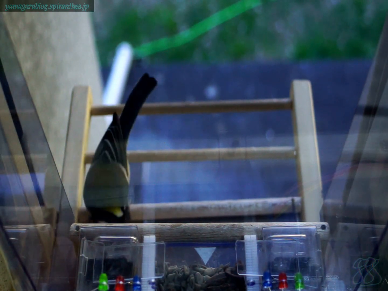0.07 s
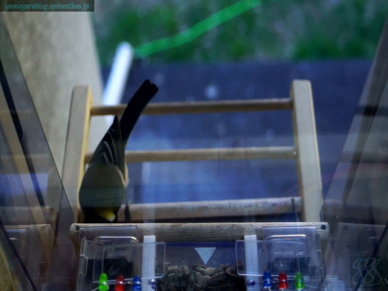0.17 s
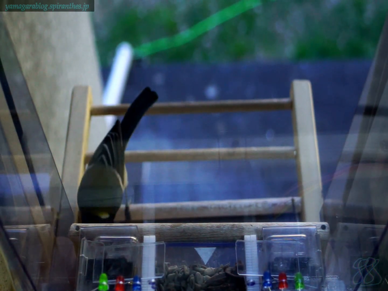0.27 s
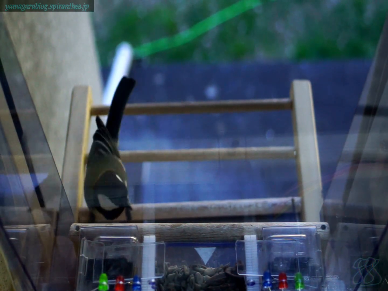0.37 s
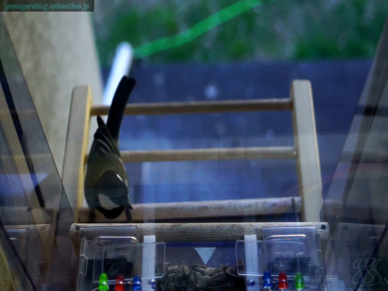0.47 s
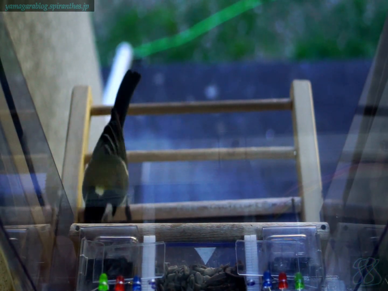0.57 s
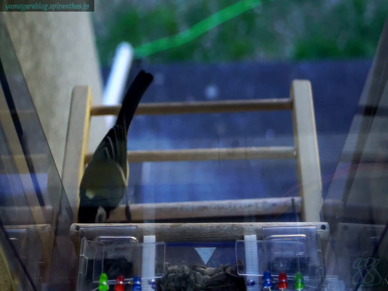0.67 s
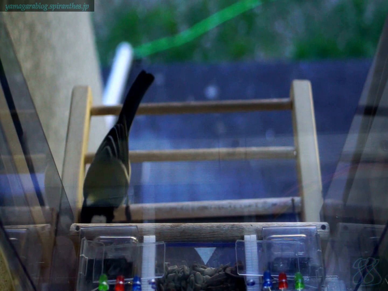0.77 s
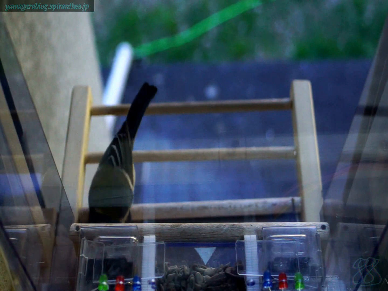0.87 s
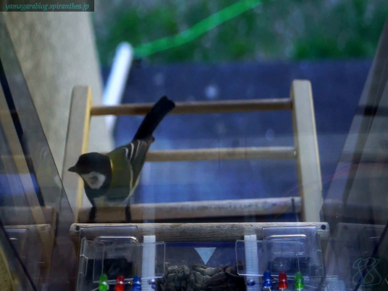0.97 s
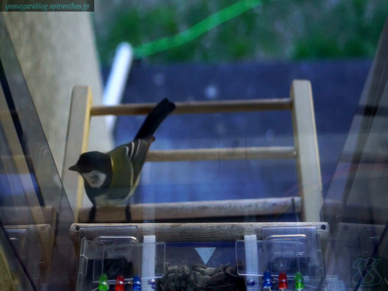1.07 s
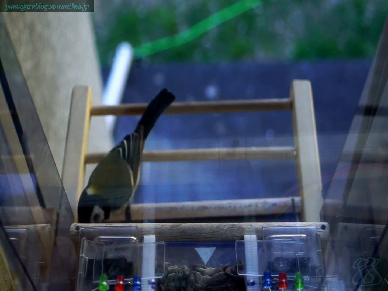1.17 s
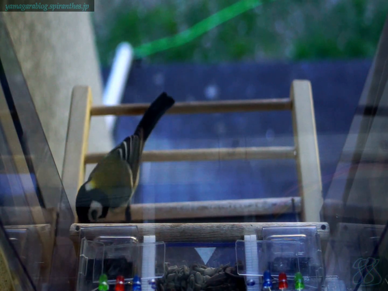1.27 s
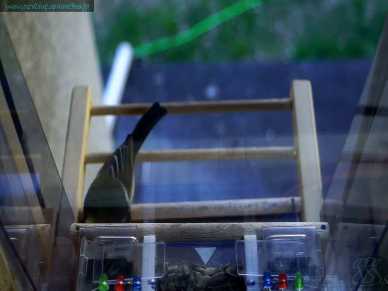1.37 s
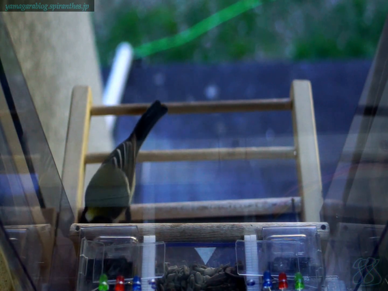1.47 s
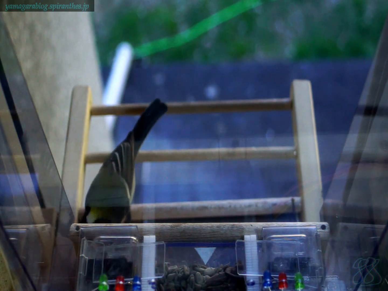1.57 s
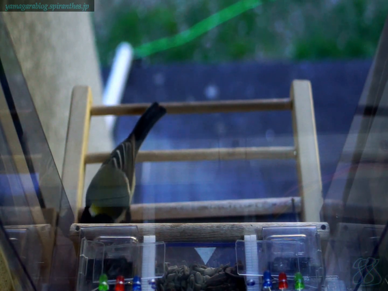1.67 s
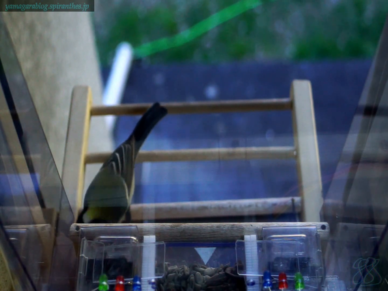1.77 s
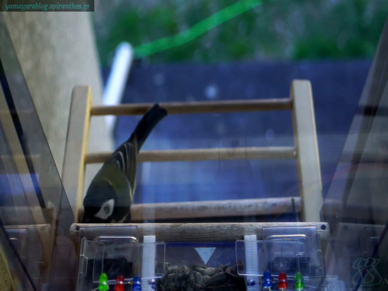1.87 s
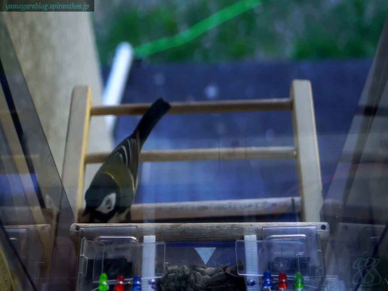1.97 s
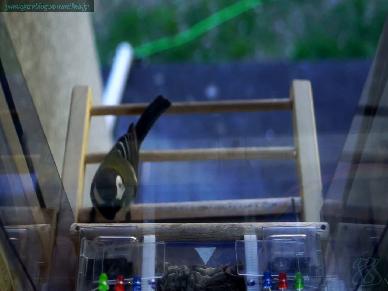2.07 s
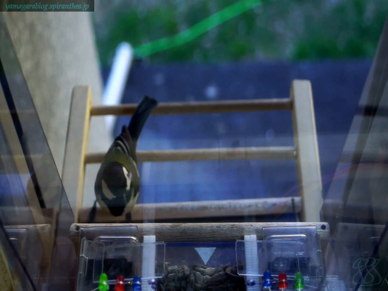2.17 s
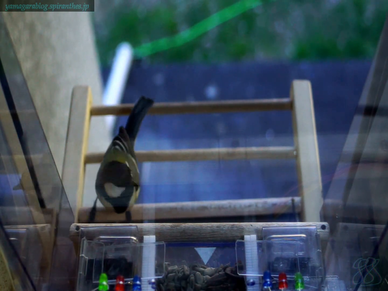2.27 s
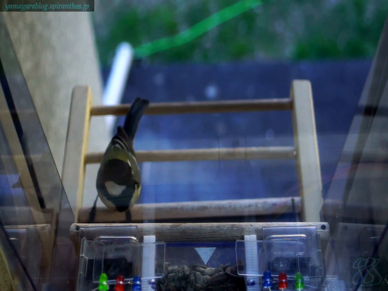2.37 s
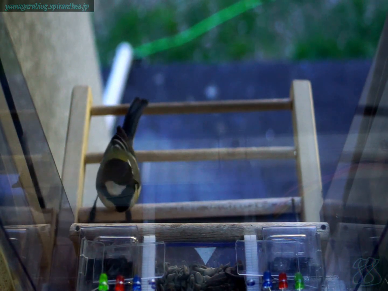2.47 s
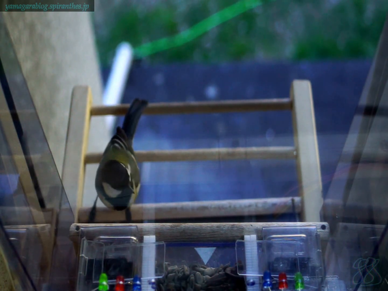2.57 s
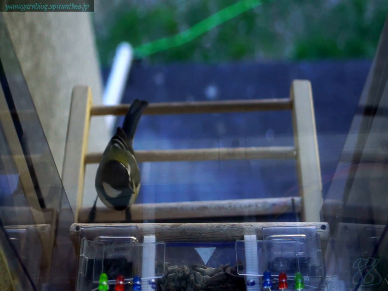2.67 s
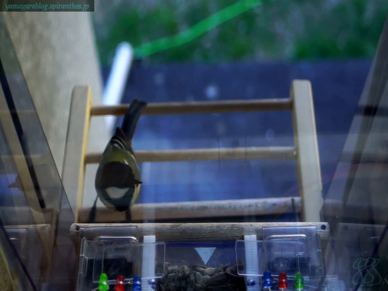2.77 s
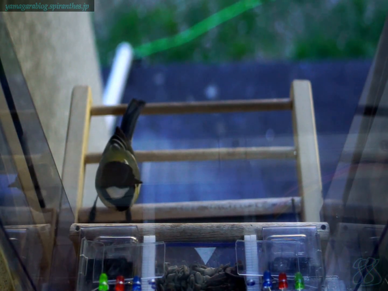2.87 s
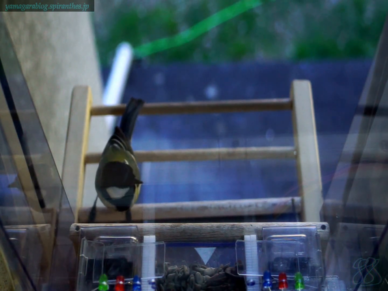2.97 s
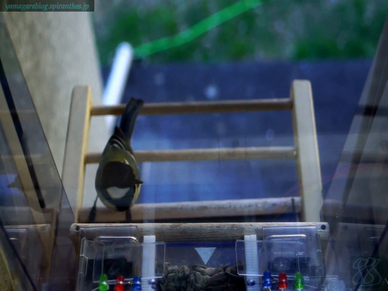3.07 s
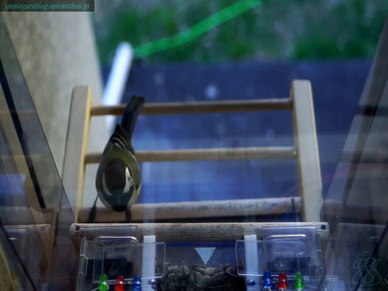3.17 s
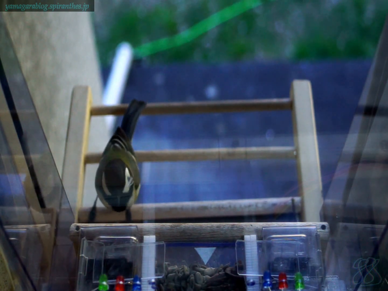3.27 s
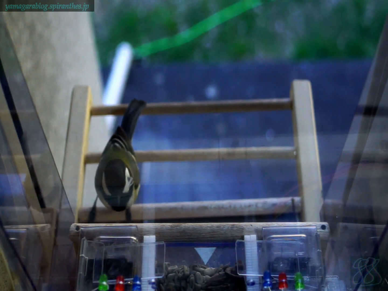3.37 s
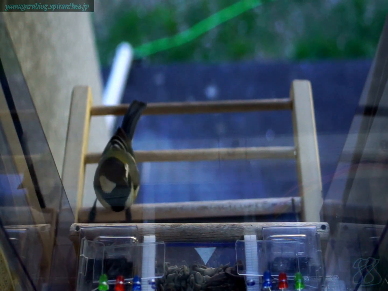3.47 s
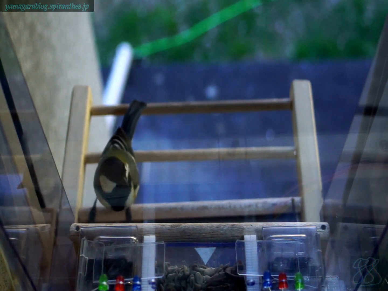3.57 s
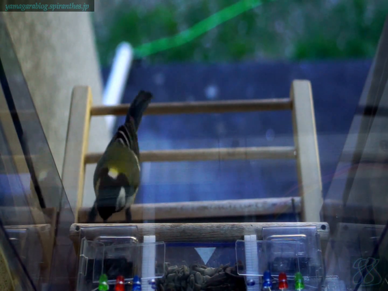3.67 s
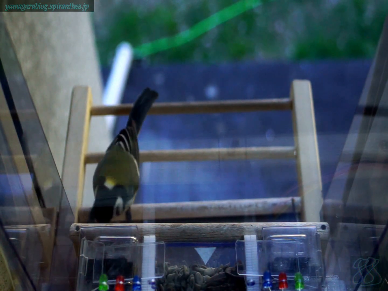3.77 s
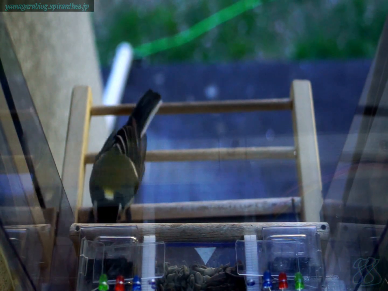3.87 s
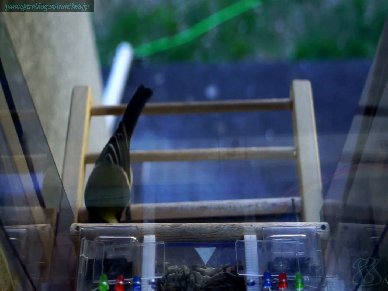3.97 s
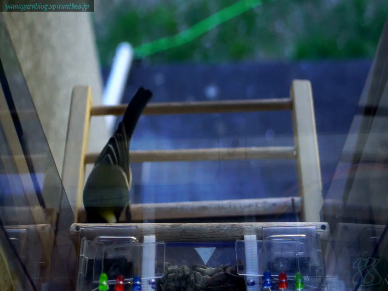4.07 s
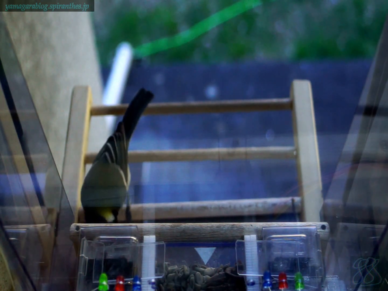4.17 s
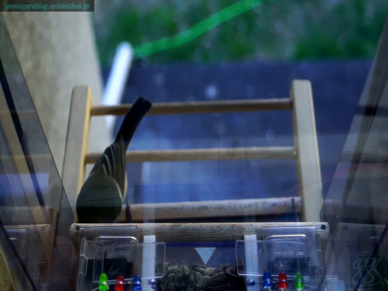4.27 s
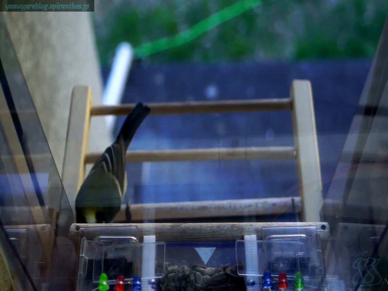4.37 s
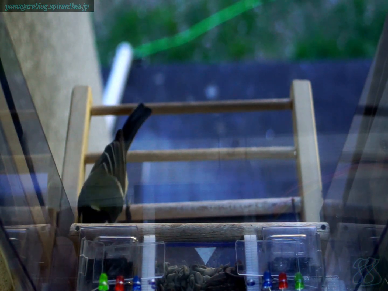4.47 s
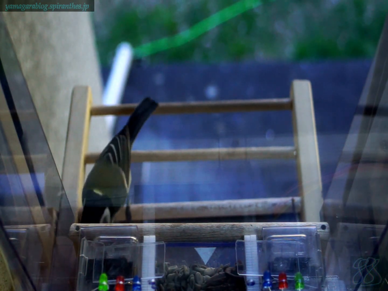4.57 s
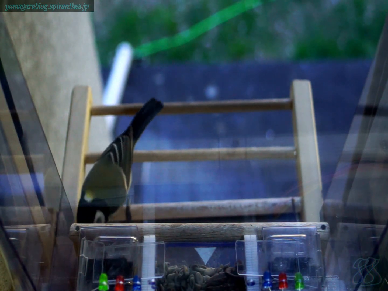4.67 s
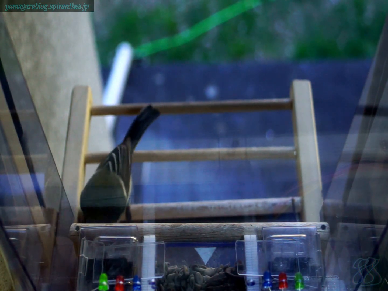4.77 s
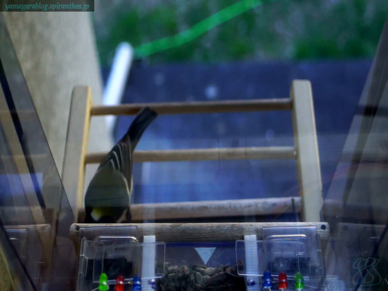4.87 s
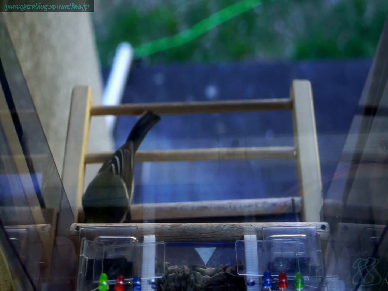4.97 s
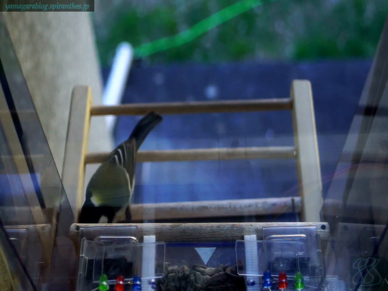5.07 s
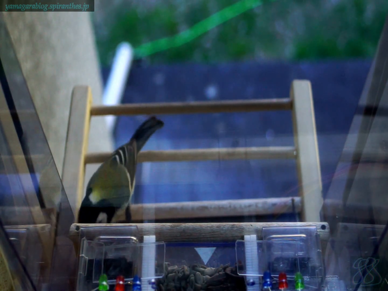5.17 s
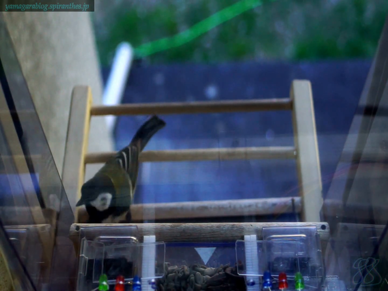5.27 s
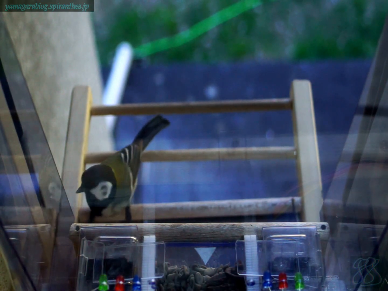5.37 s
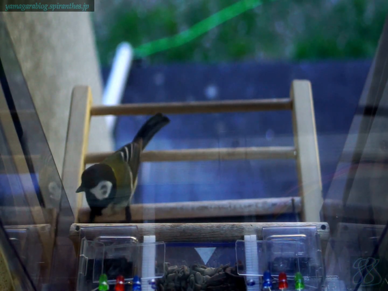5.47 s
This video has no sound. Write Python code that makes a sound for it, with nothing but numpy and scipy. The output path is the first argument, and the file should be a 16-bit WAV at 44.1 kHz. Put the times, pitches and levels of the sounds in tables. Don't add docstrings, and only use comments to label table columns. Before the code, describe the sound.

A small bird's bill raps a hollow wooden feeder in two bursts of sharp pecks over a quiet garden hush and faint hum.

```python
import sys
import numpy as np
from scipy import signal
from scipy.fft import rfft, irfft
from scipy.io import wavfile
from scipy.ndimage import uniform_filter1d

SR = 44100
rng = np.random.default_rng(int(sys.argv[2]) if len(sys.argv) > 2 else 0)


def voltage_ratio(level):
    return 10 ** (np.asarray(level, float) / 20)


def digitize_waveform(pressure):
    field = np.atleast_2d(pressure).T
    bounded = np.clip(field, -1, 1)
    quanta = np.round(bounded * 32767).astype(np.int16)
    wavfile.write(sys.argv[1], SR, quanta)


N = 243873

# pitch_hz, level_db
BILL_COLOUR = [(200, -81.5), (1100, -1.5), (1480, 2.5), (2150, 2), (2600, 1), (5000, -4), (7000, -8),
               (10000, -14)]
# pitch_hz, level_db
TREBLE_LIMIT = [(10900, 0), (11150, -8), (11400, -30), (12400, -44), (13500, -60), (16500, -90)]


def evened(x):
    return x / np.sqrt(np.mean(x ** 2) + 1e-20)


def read(points, hz):
    f, value = np.transpose(points)
    return np.interp(np.log(hz + 1), np.log(f + 1), value)


def add(mix, start_s, sound):
    part = mix[round(start_s * SR):][:len(sound)]
    part += sound[:len(part)]


def coloured(x, points):
    length = x.shape[-1]
    gain = voltage_ratio(read(points, np.fft.rfftfreq(length, 1 / SR)))
    return irfft(rfft(x) * gain, length)


def pair(frames, hz, same, lean):
    a, b, c, d = rng.standard_normal((frames, len(hz), 4)).T
    alike = np.clip(read(same, hz), -1, 1)[:, None]
    left = a + 1j * b
    right = alike * left + np.sqrt(1 - alike ** 2) * (c + 1j * d)
    lean_db = read(lean, hz)[:, None] / 2
    return np.array([left * voltage_ratio(lean_db), right * voltage_ratio(-lean_db)])


def garden():
    # pitch_hz, level_db (per Hz)
    wash_colour = [(25, -38), (87, -4.5), (200, -7), (400, -5), (800, -5.5), (1500, -11), (10800, -20.5),
                   (14000, -52)]
    # pitch_hz, likeness (1 = same)
    wash_same = [(60, 0.96), (140, 0.95), (350, 0.67), (840, 0.43), (2020, 0.035), (4870, 0.057),
                 (11700, 0.46)]
    # pitch_hz, left_minus_right_db
    wash_lean = [(60, 1), (220, -1.2), (840, -0.5), (3130, 0.2), (11700, 0.46)]
    level_db, swell_db, swell_s = -59.5, 0.4, 3
    frames, hz = N // 256 + 5, np.fft.rfftfreq(1024, 1 / SR)
    patches = rng.standard_normal((frames, len(hz))).T
    patches = uniform_filter1d(patches, size=8, axis=0)
    patches = evened(uniform_filter1d(patches, size=16, axis=1))
    patchy_db = 2.2 * np.exp(-hz / 1800)[:, None]
    colour_db = (read(wash_colour, hz) + read(TREBLE_LIMIT, hz))[:, None]
    z = pair(frames, hz, wash_same, wash_lean) * voltage_ratio(colour_db + patchy_db * patches)
    wash = evened(signal.istft(z, nperseg=1024, noverlap=768)[1][:, :N])
    t = np.arange(N) / SR
    return wash * voltage_ratio(level_db + swell_db * np.cos(2 * np.pi * (t - 1.5) / swell_s))


def hum():
    # pitch_hz, width_hz, level_db
    tones = [(52, 8, -83), (98, 14, -80), (140, 8, -83), (176, 14, -76), (248, 5, -85), (397.5, .4, -76),
             (448, 10, -80), (654, 10, -84), (792, 1.2, -83), (1147, 14, -87)]
    t, out = np.arange(N) / SR, np.zeros(N)
    for hz, width_hz, db in tones:
        r = np.exp(-np.pi * width_hz / SR)
        noise = rng.standard_normal((N, 2)) @ [1, 1j]
        drift = signal.lfilter([1], [1, -2 * r, r ** 2], noise)
        drift = drift / drift.std() + 1 / width_hz
        out += voltage_ratio(db) * evened((drift * np.exp(2j * np.pi * hz * t)).real)
    return out


def far_birds():
    # start_s, length_s, pitch_hz, fall_hz, level_db
    whistles = [
        (4.93, .065, 8100, 650, -65),
        (4.975, .05, 8050, 250, -75),
        (3.07, .3, 2610, 10, -78),
        (2.94, .07, 2770, 10, -77),
    ]
    loudest, bend = .4, .55
    out = np.zeros(N)
    for start_s, length_s, hz, fall_hz, db in whistles:
        u = np.arange(0, length_s, 1 / SR) / length_s
        pitch = hz - fall_hz / (1 + np.exp((bend - u) / .08))
        swell = np.sin(np.pi * u ** (np.log(.5) / np.log(loudest))) ** 2
        add(out, start_s, voltage_ratio(db) * swell * np.sin(2 * np.pi * np.cumsum(pitch) / SR))
    return out


def scatter():
    # pitch_hz, fade_s
    fade_times = [(150, 0.31), (400, 0.207), (900, .19), (1100, 0.14), (1600, 0.17), (2760, 0.18),
                  (7280, 0.15)]
    # pitch_hz, likeness (1 = same)
    tail_same = [(200, 1), (600, 0.72), (1200, .85), (2500, 0.17), (5000, 0.16), (10000, 0.12)]
    # pitch_hz, left_minus_right_db
    tail_lean = [(300, -13.5), (800, 13), (1200, 16), (2500, -9.7), (4000, 4), (9000, -5)]
    hz, t = np.fft.rfftfreq(128, 1 / SR), np.arange(560) * 32 / SR
    near_walls = voltage_ratio(-8 - 60 * t / 0.018)
    tail = voltage_ratio(-60 * t / read(fade_times, hz)[:, None])
    z = pair(len(t), hz, tail_same, tail_lean) * np.hypot(near_walls, tail)
    return signal.istft(z, nperseg=128, noverlap=96)[1]


def niche(wood, clicks, still):
    # pitch_hz, left_db, right_db, fade_s (to -60 dB), right_lag_rad
    air_modes = [(202.5, -1, -2, .4, 0.17), (332, -9.5, -8.5, 0.2, 0.55), (480, -7, -7.5, 0.17, 0.42),
                 (707, -7, -8.5, 0.15, 0.72), (793, -32, -27.5, 0.28, .2), (866, -3, -11, 0.17, .3),
                 (922, -9, -11.5, 0.19, 0.48), (1033.3, -11, -13, 0.076, .2), (1185, -9, -10, 0.096, .2)]
    # delay_s, left_gain, right_gain
    echoes = [(.0021, 0.2, 0.35), (.0043, -0.059, -0.24), (.0069, .2, -0.15), (0.016, 0.21, 0.027),
              (0.0188, -0.25, -0.21), (0.03, -0.18, 0.019)]
    shift = .6
    tail = np.sqrt(1 - shift) * still + np.sqrt(shift) * scatter()
    t = np.arange(tail.shape[1]) / SR
    tail = tail * (1 - np.exp(-t / 0.005)) / np.linalg.norm(tail[0])
    bins = rfft(tail)
    power = abs(bins) ** 2
    lumps = np.sqrt(uniform_filter1d(power, size=10) / uniform_filter1d(power, size=900))
    tail = irfft(bins / lumps, len(t)) * (t < .35)
    box = voltage_ratio(-8) * tail
    for hz, left_db, right_db, fade_s, lag_rad in air_modes:
        swing = np.sin(2 * np.pi * hz * t - np.array([[0], [lag_rad]]))
        box += voltage_ratio(-36.0) * voltage_ratio([[left_db], [right_db]]) * voltage_ratio(-60 * t / fade_s) * swing
    box[:, 0] += voltage_ratio([1.5, 1.5])
    for delay_s, *gains in echoes:
        box[:, round(delay_s * SR)] += gains
    tail[:, 0] += voltage_ratio([-14, -14])
    knock = signal.oaconvolve(wood[None], box, axes=1)
    heard = knock + signal.oaconvolve(clicks[None], tail, axes=1)
    return heard[:, :N]


def rattle(t, fade_s=0.092):
    hiss = evened(coloured(rng.standard_normal((2, len(t))), BILL_COLOUR))
    return hiss * voltage_ratio(-60 * t / fade_s) * (1 - np.exp(-(t / 0.00094) ** 2))


def tick(t):
    clicks = np.zeros(len(t))
    clicks[40] = 1
    at, size = rng.random((2, 2))
    rebound_s = .001 + .004 * at
    clicks[40 + (rebound_s * SR).astype(int)] = .1 + .25 * size
    return coloured(clicks, BILL_COLOUR)


def ring(modes, t, detune, focus_hz=1000, spread=np.inf):
    out = 0
    for hz, db, fade_s in modes:
        octaves_off = np.log2(hz / focus_hz)
        level_db = db - 8.1 * (octaves_off / spread) ** 2 - 60 * t / fade_s
        out = out + voltage_ratio(level_db) * np.sin(2 * np.pi * hz * detune * t)
    return out


def wooden_parts(t, focus_hz, spread, tick_db):
    # pitch_hz, level_db, fade_s (to -60 dB)
    tray = [(872, -2, 0.038), (937.3, 5.5, 0.028), (1041, 12.5, 0.029)]
    slat = [(1140, -2.2, 0.05), (1176.7, 0.61, 0.034)]
    rail = [(1470, 0, .022)]
    frame = [(304.4, -5.5, 0.022), (492, 5, 0.017), (698.4, 5.5, 0.017)]
    perch = [(2500, 0, .022), (3280, -3, .016), (3560, -3, .016)]
    a, b, c = 1 + .02 * rng.standard_normal(3)
    spread = max(spread, .03)
    wood = voltage_ratio(-14.5) * ring(tray, t, a, focus_hz, spread)
    wood += voltage_ratio(-10.5) * ring(slat, t, b ** 0.22, focus_hz, spread)
    wood += voltage_ratio(-3) * ring(rail, t, c ** .5, focus_hz, spread)
    wood += voltage_ratio(-20.0) * ring(frame, t, a)
    wood += voltage_ratio(tick_db - 4.0) * ring(perch, t, c)
    return wood * (1 - np.exp(-(t / 0.0026) ** 2))


def pecks():
    # start_s, blow_db, favoured_pitch_hz, spread_octaves, bill_tick_db
    blows = [
        (1.176, -10.5, 1000, 0.5, -11),
        (1.431, -5, 1046, 0.42, -16),
        (1.626, -9, 1016, 0.46, -10),
        (4.103, -15.5, 1170, 0.7, -7.5),
        (4.267, -9, 1079, 0.35, -11),
        (4.616, -8, 1080, 0.36, -11.5),
        (4.812, -5, 1018, 0.45, -13.5),
        (5.045, -6, 1057, 0.41, -13),
    ]
    nudges = [
        (0.054, -27, 1147, .12, -11),
        (0.169, -38, 1147, 0.05, -26),
        (0.674, -20.5, 1175, 0.17, -16.5),
        (0.946, -36, 1167, 0.085, -31),
    ]
    # start_s, level_db
    faint_ticks = [
        (.64, -64),
        (.172, -61),
        (.36, -66),
        (2.098, -61),
        (2.115, -63),
    ]
    # pitch_hz, level_db
    thin_bass = [(30, -17), (100, -11), (180, -9.5), (300, 1.5)]
    variants = 4
    wood_mix, clicks, seeds = np.zeros((variants, N)), np.zeros((variants, N)), np.zeros((N, 2))
    t = np.arange(4096) / SR
    for k, (start_s, blow_db, focus_hz, spread, tick_db) in enumerate([*blows, *nudges]):
        wood = wooden_parts(t, focus_hz, spread, tick_db)
        tilt = [(2000, 0.017), (16000, -3 * 0.39 * (tick_db + 12.5))]
        click = coloured(tick(t), tilt)
        husks = coloured(rattle(t), tilt)
        add(wood_mix[k % variants], start_s + 0.000792, voltage_ratio(blow_db + 7) * wood)
        add(clicks[k % variants], start_s + .0008, voltage_ratio(blow_db + tick_db + 28) * click)
        add(seeds, start_s, voltage_ratio(blow_db + tick_db + 1) * husks.T)
    for start_s, db in faint_ticks:
        add(seeds, start_s, voltage_ratio(db) * rattle(t, fade_s=0.17).T)
    return coloured(wood_mix, thin_bass), clicks, seeds.T


def scene():
    wood, clicks, seeds = pecks()
    still = scatter()
    knocks = sum(niche(w, c, still) for w, c in zip(wood, clicks))
    return knocks + seeds + garden() + hum() + far_birds() * voltage_ratio([[1.5], [-1.5]])


def low_pass(x):
    return signal.sosfilt(signal.butter(12, 12320, fs=SR, output="sos"), x)


def record(dry):
    x = coloured(dry, TREBLE_LIMIT)
    x = x - 0.0018 * x ** 3
    return low_pass(x)


dry = scene()
out = record(dry)
digitize_waveform(out)
```